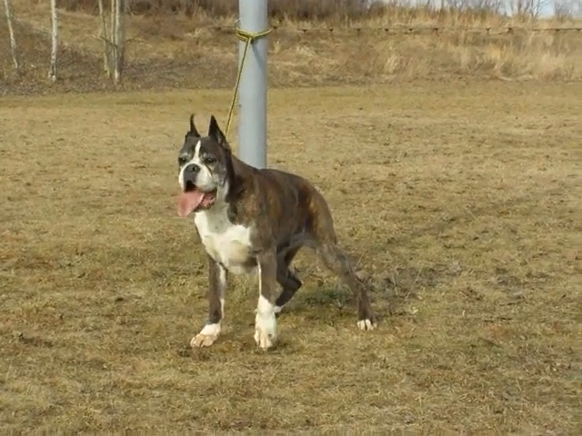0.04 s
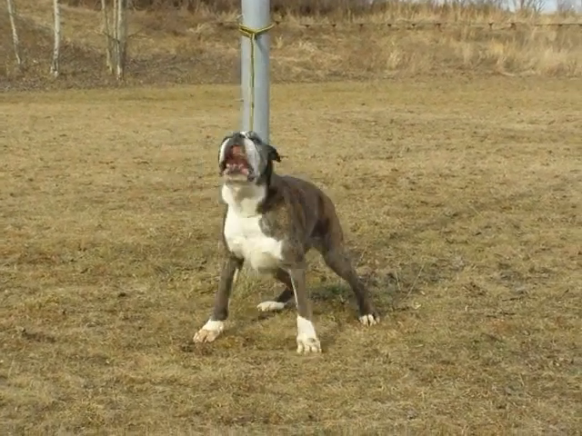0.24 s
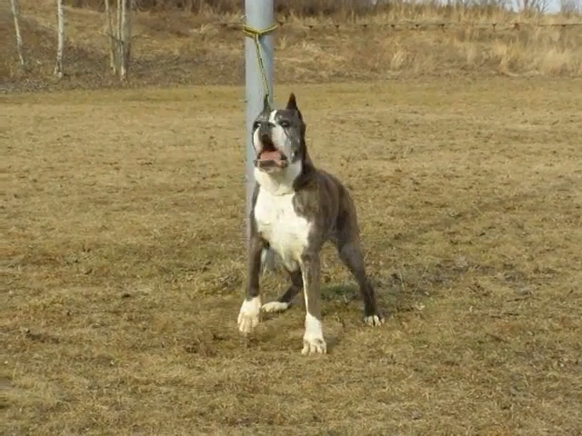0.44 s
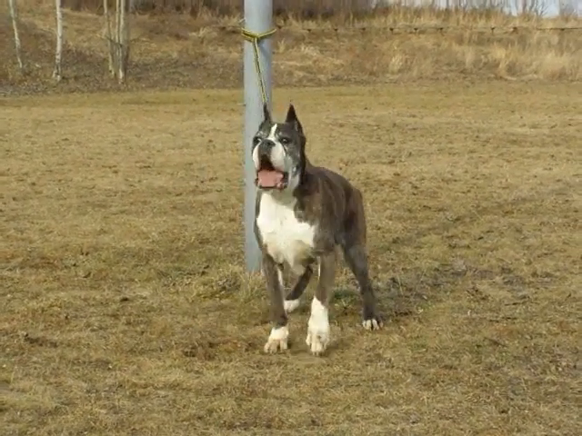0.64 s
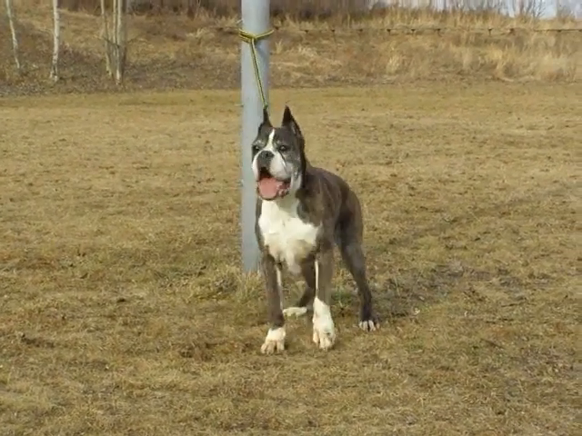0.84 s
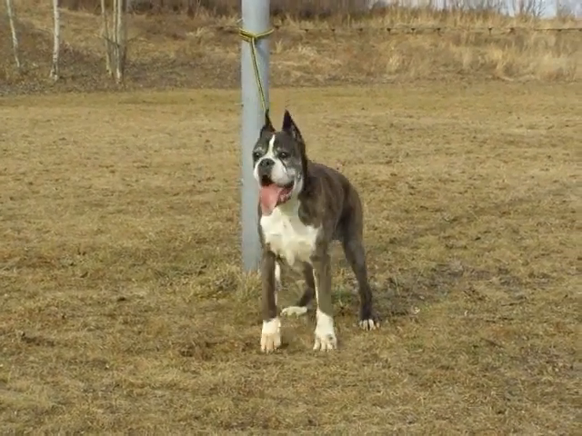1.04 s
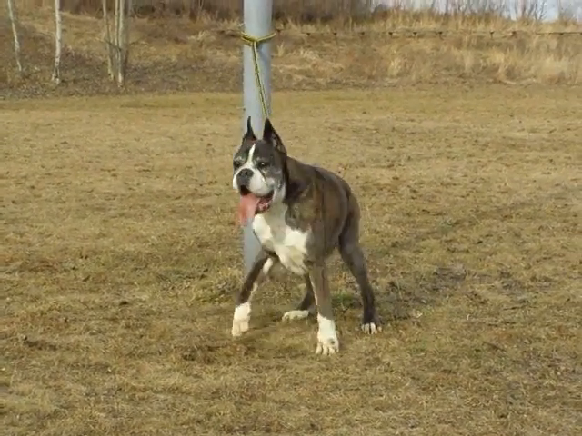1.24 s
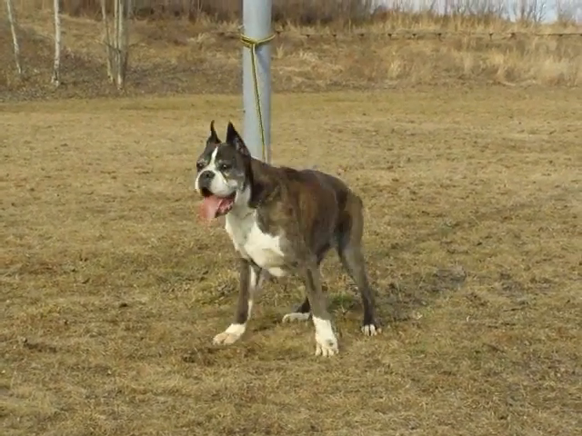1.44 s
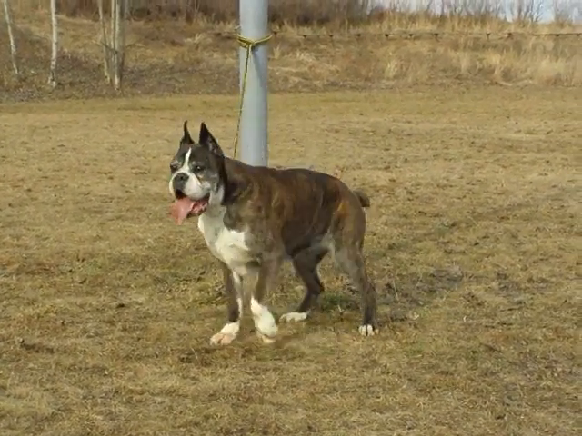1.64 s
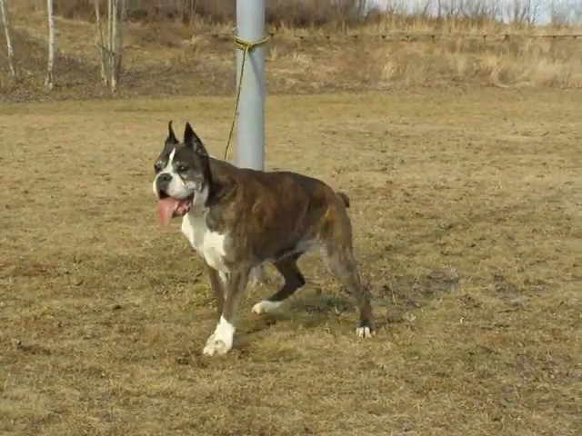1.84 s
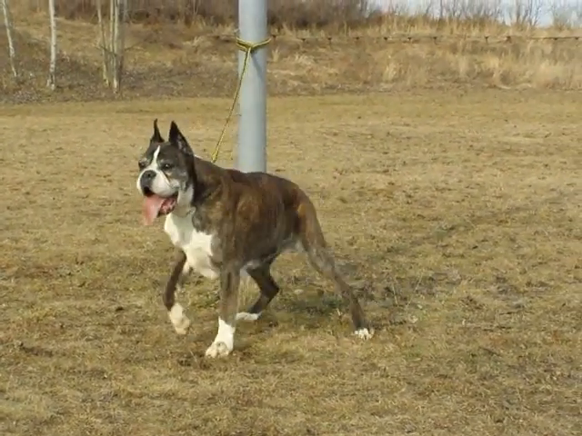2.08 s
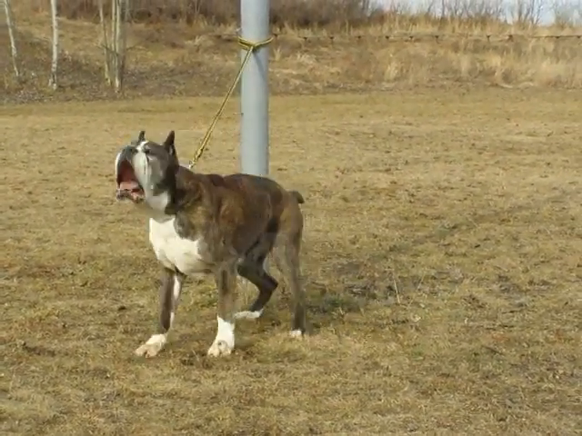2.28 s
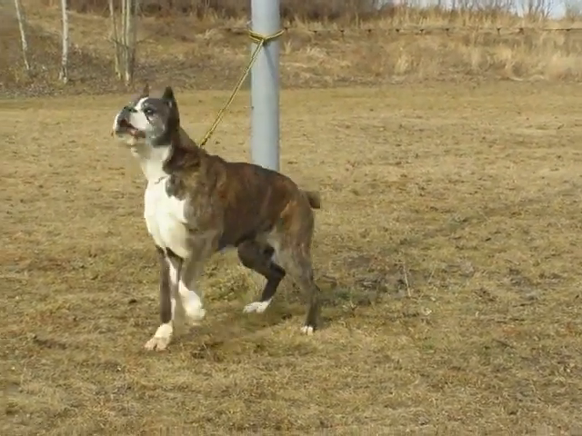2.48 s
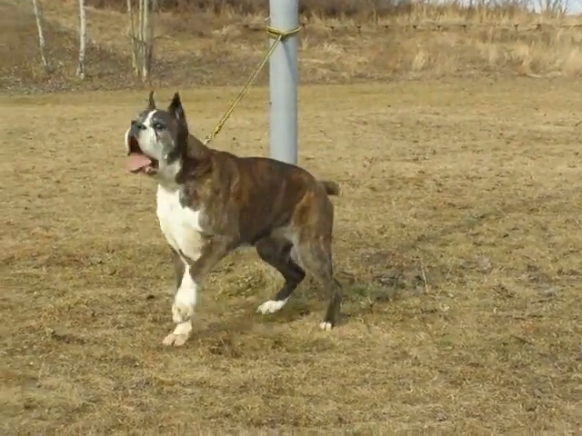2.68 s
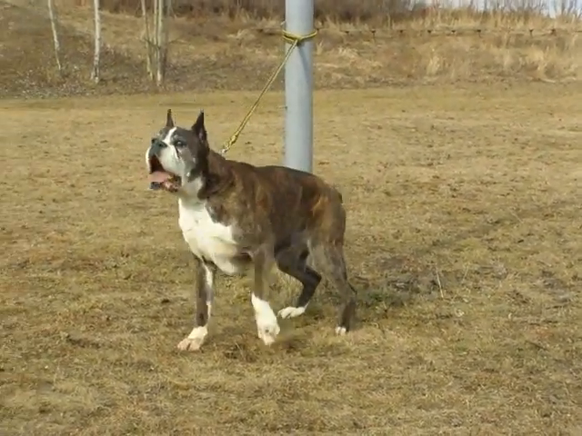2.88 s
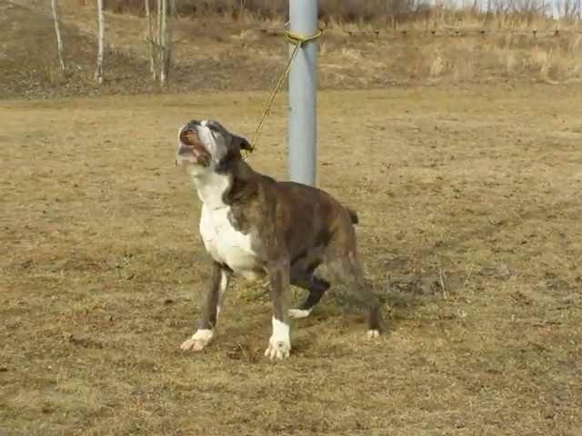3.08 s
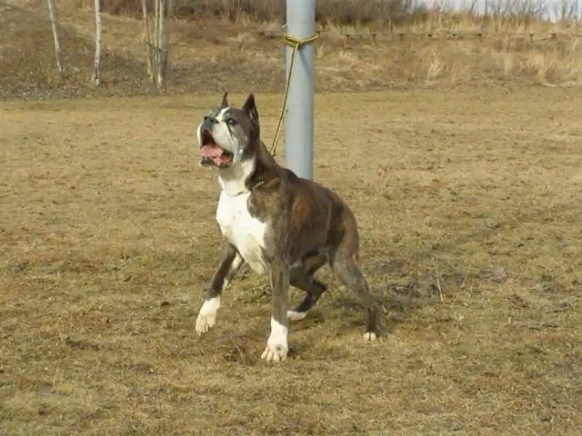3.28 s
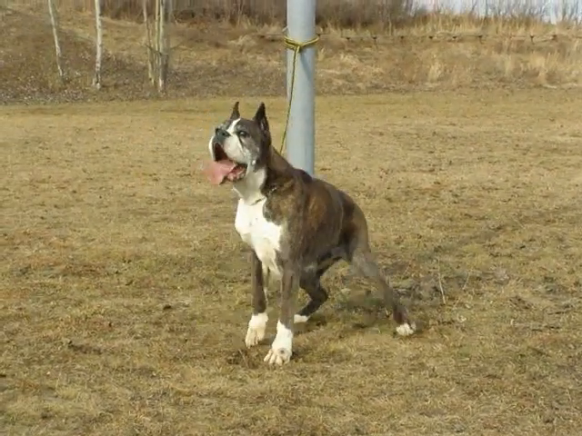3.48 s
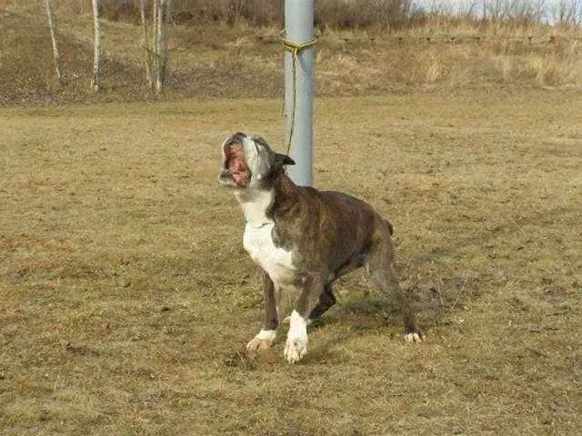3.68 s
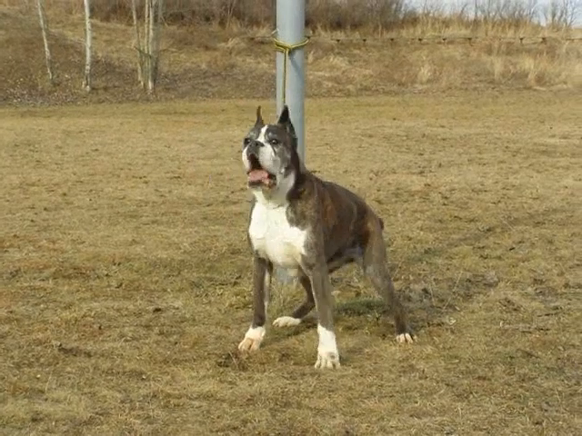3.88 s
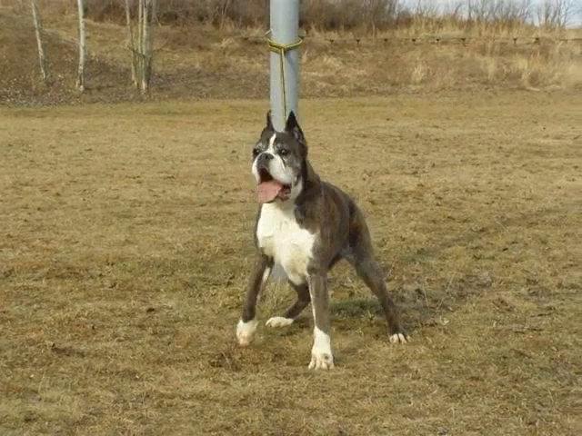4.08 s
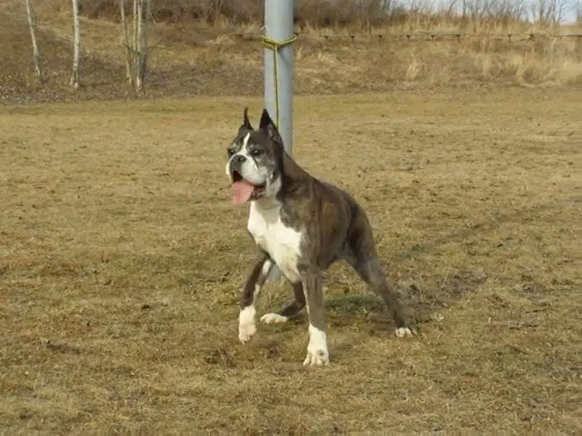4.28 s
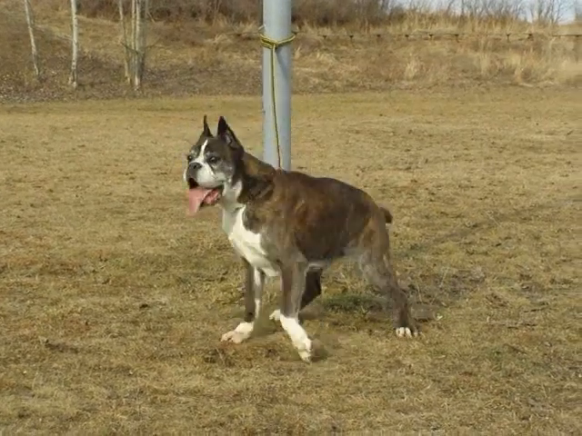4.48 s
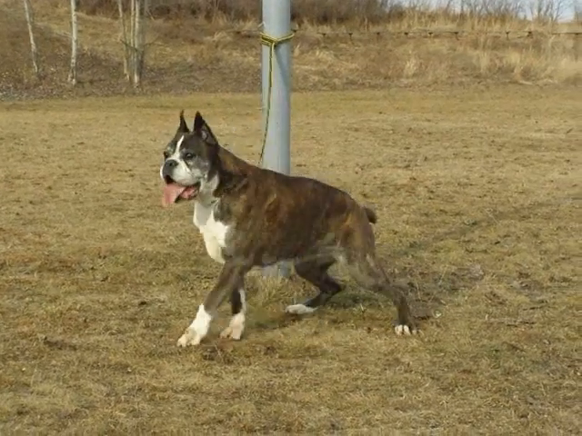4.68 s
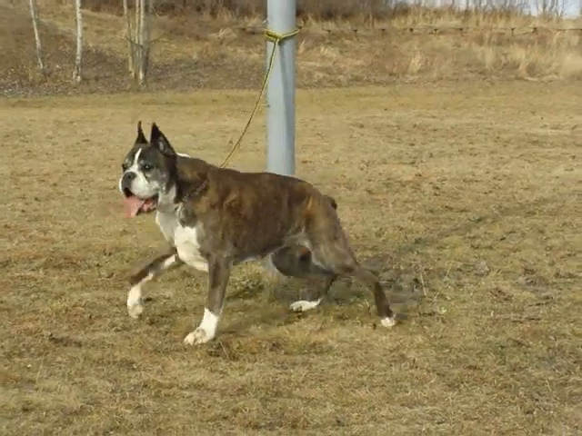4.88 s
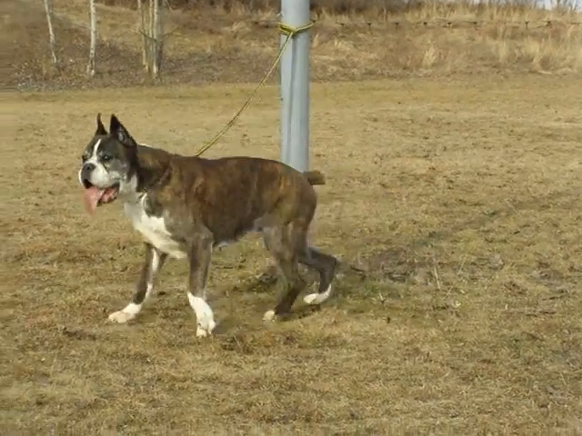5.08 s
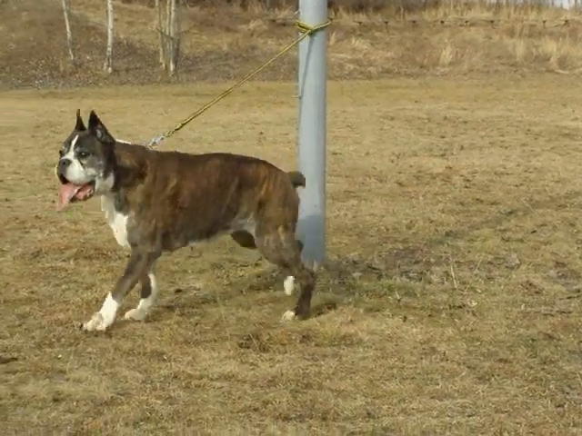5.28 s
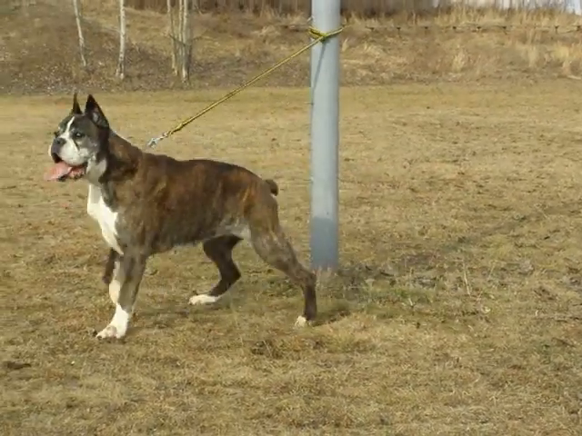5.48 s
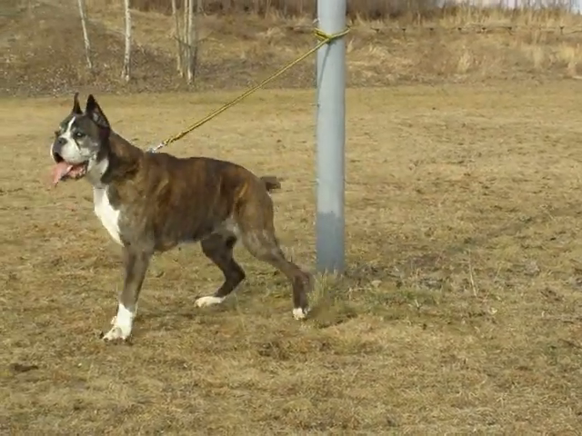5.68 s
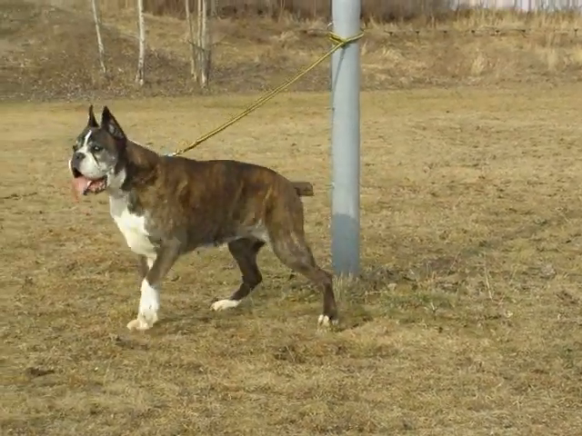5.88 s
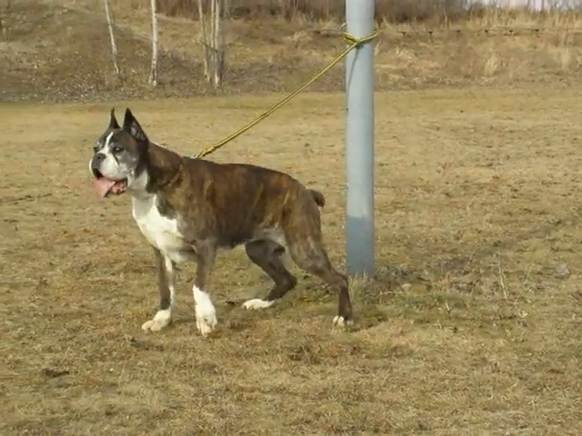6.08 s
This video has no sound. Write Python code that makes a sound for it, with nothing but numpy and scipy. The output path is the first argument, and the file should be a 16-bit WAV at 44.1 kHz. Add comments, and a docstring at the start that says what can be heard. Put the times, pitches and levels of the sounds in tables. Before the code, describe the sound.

Over a faint, steady outdoor rumble, a dog lets out four short, rough barks: one at the start, then three closer together after some huffing and panting. Soft paw thuds, a smack of the lips and a brief, faint whine fall between the later barks. The dog then goes on panting lightly. The barks echo a little across open ground, and a cheap camera microphone adds a grainy edge.

```python
"""Over a faint outdoor rumble, an old dog tied to a pole in a field huffs, barks four times and pants.
Each bark rises as a clean tone, breaks into a rough roar as the vocal folds are overblown, and sinks
away in a low grunt. An earth bank reflects it; paws thud on the turf, the dog gasps, and before the
last bark its lips pop and it whines. A pocket camera samples it all slowly and coarsely and holds
each sample, which adds a gritty mirrored treble."""
import sys
import numpy as np
from scipy import signal
from scipy.fft import rfft, irfft, next_fast_len
from scipy.io import wavfile
from scipy.ndimage import uniform_filter1d, map_coordinates

SR = 44100
rng = np.random.default_rng(int(sys.argv[2]) if len(sys.argv) > 2 else 0)


def dump(signal):
    """Clip the signal to [-1, 1] and save it as 16-bit WAV at the path in sys.argv[1]."""
    limited = np.clip(np.atleast_2d(signal).T, -1, 1)
    pcm = np.round(limited * 32767).astype(np.int16)
    wavfile.write(sys.argv[1], SR, pcm)


N = 270774
TIME = np.arange(N) / SR

# outdoor background (frequency [Hz], level [dB])
AIR_SPECTRUM = [(10, -27.5), (25, -13), (40, -14.5), (80, -8), (280, -4), (520, -4), (800, -11),
                (1400, -12.5), (2300, -17), (3200, -22.5), (4000, -18.5), (5000, -60)]
# huffs as the jaws open (time [s], level [dB], decay time [s], lips [0 forward to 1 drawn back])
JAW_HUFFS = [(0.309, -29.5, 0.015, 0.26), (.971, -25, 0.018, 0.033), (1.455, -37, 0.012, 0.42),
             (1.879, -34.5, 0.011, 0.33), (2.351, -28.5, 0.027, 0.34), (3.096, -35, 0.027, 0.22),
             (3.562, -33.5, 0.0089, 0.32), (3.763, -32.5, 0.038, 0.26), (4.808, -45, 0.018, 0.56),
             (5.173, -41.5, .01, 0.75), (5.595, -43, 0.0057, 0.27), (6.055, -44, .015, 0.9)]
# pants (time [s], attack [s], length [s], level [dB], lips [0 forward to 1 drawn back])
PANT_BREATHS = [ (0.995, 0.064, 0.18, -30, 0.028), (1.453, 0.0094, 0.16, -35, 0.45),
                (1.878, 0.0092, 0.2, -35.5, 0.51), (4.396, 0.0098, 0.16, -31, 0.059),
                (4.804, .032, 0.15, -34, 0.66), (5.193, 0.0096, 0.16, -36.5, 1),
                (5.598, 0.0076, 0.17, -36, 0.63), (6.045, 0.053, 0.12, -35.5, 0.98)]
# mouth resonances with the lips forward, then drawn back (frequency [Hz], level [dB])
LIPS_FORWARD = [(150, -43), (330, -11.5), (520, -7.5), (700, -12.5), (1080, 6), (1450, -14), (1780, -10.5),
                (2020, -16.5), (2330, 0), (2650, -5.5), (3050, -12), (3400, -42), (4000, 6)]
LIPS_BACK = [(150, -13), (330, -9.5), (520, 1), (720, -12.5), (1100, 4.5), (1500, -17), (1850, -2.5),
             (2100, -14), (2500, -6.5), (2800, -6), (3130, 2), (3500, -9), (4000, -14)]
# barks (time [s], swell [s], time to the break [s], length before the grunt [s], grunt length [s],
# first pitch [Hz], pitch at the break [Hz], level [dB], extra chest [dB], extra treble [dB],
# treble burst [dB], grunt level [dB])
BARK_CALLS = [ (.355, 0.061, .058, .18, 0.065, 289.8, 449, -2.5, 5.5, 3.5, 6.5, -29),
              (2.404, 0.072, .079, 0.21, .066, 262.1, 425.4, 0, -1, 1, 6, -29.5),
              (3.126, 0.064, .064, .202, .070, 307.6, 442, -0.5, 1.5, -1, 10.5, -29.5),
              (3.792, 0.03, 0.049, 0.16, .066, 284.5, 476.6, 1, -2, 0, 9, -26.5)]
# chest, throat and treble registers of the voice
# (delay [s], attack curve [exponent], roar level [dB], burst decay [s], sag [dB/s], release [s])
VOICE_REGISTERS = [ (0.011, 1.54, -25.5, 0.015, 47, 0.0027), (0.0012, 0.92, -14.5, 0.09, 2, 0.03),
                   (0.009, 1.44, -24.5, 0.029, 24, 0.021)]
# vocal tract resonances with the mouth opening, then wide (frequency [Hz], level [dB])
TRACT_OPENING = [(250, 12), (700, 26.5), (1150, 18), (1330, -17), (1560, -17.5), (1850, 4.5), (2050, -17.5),
                 (2300, -1), (2700, 2), (3050, -21), (3900, -21)]
TRACT_WIDE = [(180, -59.5), (300, -16.5), (375, -13), (500, -13), (590, 1.5), (670, -1), (790, 2.5),
              (960, 8), (1130, -1), (1400, -29.5), (1600, -28.5), (1730, -18), (1900, -20.5), (2030, -38),
              (2200, -18.5), (2450, -18), (2700, -23.5), (2980, -41.5), (3400, -28), (3900, -32)]
# decay of the scattered echo (frequency [Hz], time to fall 60 dB [s])
TAIL_DECAY = [(150, 1), (600, 0.44), (1200, 1), (3000, 0.69)]
# colour of the whole echo (frequency [Hz], level [dB])
ECHO_SPECTRUM = [(200, -6.5), (400, 1), (650, 5), (1100, -7), (2500, -9.5)]
# paws landing (time [s], level [dB])
FOOTFALLS = [(0.57, -39), (.594, -33), (.629, -35), (2.881, -38), (2.927, -38.5), (3.006, -27),
             (3.046, -26), (3.071, -26), (3.099, -30.5), (3.126, -30), (3.459, -42.5), (5.529, -36)]
# thud of the turf (frequency [Hz], level [dB])
TURF_SPECTRUM = [(30, -30.5), (55, -30), (80, -8.5), (115, -3), (185, 7), (300, 2), (500, -14), (900, -28),
                 (2000, -70)]
# a paw dragging through dry grass (time [s], length [s], level [dB])
PAW_DRAGS = [(5.494, 0.075, -46.5)]
# gasps (time [s], length [s], level [dB], whistle frequency [Hz], whistle level [dB])
IN_BREATHS = [(0.576, 0.15, -42.5, 3230, -53), (2.667, 0.12, -38, 2257, -46), (3.385, 0.15, -37, 2316, -45),
              (4.006, 0.14, -37, 2350, -50)]
# mouth resonances as air is drawn in (frequency [Hz], level [dB])
INHALE_SPECTRUM = [(150, -7), (400, -0.5), (600, -1), (1000, -1), (1450, -9.5), (1850, -8), (2050, -5),
                   (2300, -5.5), (2650, -8), (2950, -13.5), (3280, 2.5), (3550, 2.5), (4000, -9)]
# wet pops of the loose lips (time [s], mouth resonance [Hz], level [dB])
LIP_POPS = [(3.462, 927.6, -14), (3.482, 930, -13), (3.559, 1310, -22.5)]
# a thin whine (time [s], length [s], first pitch [Hz], fall [Hz/s], level [dB])
NASAL_WHINES = [(3.618, .135, 572, 606, -36)]

ROAR_HZ, GRUNT_HZ = 392.3, 129.7  # pitch through the roar and at the end of the grunt
RISE_ROUGH, ROAR_ROUGH, GRUNT_ROUGH = 0.12, 0.86, 0.33  # 0 regular to 1 fully rough


def amp(db):
    """Decibels to amplitude ratio."""
    return 10 ** (np.asarray(db) / 20)


def unit(x):
    """Normalisation to rms 1."""
    return x / np.sqrt(np.mean(x ** 2) + 1e-20)


def steady(x, window_s=0.0065):
    """Normalisation to a running rms of 1, which keeps the fast grain."""
    size = max(int(window_s * SR), 50)
    power = uniform_filter1d(uniform_filter1d(x * x, size), size)
    return x / np.sqrt(np.abs(power) + 1e-12)


def along(points, hz):
    """Interpolation of (frequency [Hz], value) points on a logarithmic axis."""
    f, v = np.transpose(points)
    return np.interp(np.log(hz + 1), np.log(f + 1), v)


def wobble(rate):
    """Smooth random modulation: a spline through `rate` knots a second."""
    return map_coordinates(rng.standard_normal(int(N * rate / SR) + 4), [TIME * rate])


def filtered(x, response):
    """Linear filtering: the spectrum of x times a frequency response."""
    size = next_fast_len(N + SR // 2)
    return irfft(rfft(x, size) * response(np.fft.rfftfreq(size, 1 / SR)), size)[:N]


def ring(x, spectrum, size=4096):
    """Minimum-phase filtering: resonances ring only after their excitation."""
    gain = amp(along(spectrum, np.fft.rfftfreq(size, 1 / SR)))
    cepstrum = irfft(np.log(gain + 1e-6))
    cepstrum[1:size // 2] *= 2
    cepstrum[size // 2 + 1:] = 0
    return signal.fftconvolve(x, irfft(np.exp(rfft(cepstrum))))[:N]


def band(x, lo_hz, hi_hz, order=12):
    """Band-pass filtering, with edges that steepen with the order."""
    return filtered(x, lambda f: (1 - 1 / (1 + (f / lo_hz) ** order)) / (1 + (f / hi_hz) ** order))


def noise(spectrum):
    """Spectral shaping of white noise, at rms 1."""
    return unit(filtered(rng.standard_normal(N), lambda f: amp(along(spectrum, f))))


def envelope(start, attack, length, release, sag_db_per_s=0, curve=1):
    """Amplitude envelope: attack, sagging hold and release."""
    t = TIME - start
    rise = np.clip(t / attack, 0, 1) ** curve
    fall = np.clip((length - t) / release, 0, 1)
    return rise * fall * amp(-sag_db_per_s * np.clip(t - attack, 0, length))


def field(level_db=-50.5, drift_db=0.4):
    """Ambient noise: a far rumble and a soft hiss of air, nearly stationary."""
    return amp(level_db + drift_db * wobble(2)) * noise(AIR_SPECTRUM)


def mouth(resonances):
    """Source and filter: turbulent air is coloured by the mouth cavity, at rms 1."""
    return unit(band(noise(resonances), 130, 3200))


def panting(flutter_db=1.58, flap_db=2.0, flap_hz=52):
    """Turbulent flow: huffs escape as the jaws open; the flapping tongue modulates each pant."""
    forward, back = mouth(LIPS_FORWARD), mouth(LIPS_BACK)
    air = lambda lips: np.sqrt(1 - lips) * forward + np.sqrt(lips) * back
    flap = np.sin(2 * np.pi * np.cumsum(flap_hz * (1 + 0.2095 * wobble(30))) / SR)
    tongue = unit(amp(flutter_db * wobble(170) + flap_db * flap))
    sound = np.zeros(N)
    for start, db, decay, lips in JAW_HUFFS:
        age = np.clip((TIME - start) / decay, 0, 10)
        sound += amp(db) * (1 - np.exp(-age / 0.08)) * np.exp(-1.5 * age ** 2) * air(lips)
    for start, attack, length, db, lips in PANT_BREATHS:
        breath = envelope(start, attack, length, release=0.066, sag_db_per_s=19)
        sound += amp(db) * breath * tongue * air(lips)
    return sound


def vocal_folds(catch_s=0.013, lead_s=0.009, break_s=0.023, settle_s=0.022, relax_s=0.015):
    """Pitch and roughness of a driven oscillator: it catches, climbs, breaks, droops as pressure goes."""
    pitch, rough = np.full(N, ROAR_HZ), np.zeros(N)
    for start, _, climb_s, length, grunt_s, first_hz, top_hz, *_ in BARK_CALLS:
        now = TIME >= start
        t = TIME[now] - start
        climb = first_hz + (top_hz - first_hz) * np.minimum(t / climb_s, 1)
        settled = np.clip((t - climb_s) / settle_s, 0, 1)
        droop = np.clip((t - length) / grunt_s, 0, 1) ** 1.5
        pitch[now] = climb + (ROAR_HZ - climb) * settled + (GRUNT_HZ - ROAR_HZ) * droop
        catch = 0.31 * np.exp(-t / catch_s)
        breaking = (ROAR_ROUGH - RISE_ROUGH) * np.clip((t - climb_s + lead_s) / break_s, 0, 1)
        relaxing = (GRUNT_ROUGH - ROAR_ROUGH) * np.clip((t - length) / relax_s, 0, 1)
        rough[now] = RISE_ROUGH + catch + breaking + relaxing
    return pitch * (1 + 0.012 * wobble(60)), np.clip(rough, 0, 1)


def register_gains(chest_burst_db=12.5, throat_burst_db=-1.5):
    """Onset transient and sustain: each register swells, settles to the roar, ends; the chest grunts on."""
    gain = np.zeros((len(VOICE_REGISTERS), N))
    for start, swell, _, length, grunt_s, _, _, db, chest_db, treble_db, bite_db, grunt_db in BARK_CALLS:
        since_swell = np.maximum(TIME - start - swell, 0)
        extras, bursts = (chest_db, 0, treble_db), (chest_burst_db, throat_burst_db, bite_db)
        for k, (delay, curve, roar_db, burst_s, sag, release) in enumerate(VOICE_REGISTERS):
            burst_db = bursts[k] * np.exp(-(since_swell / burst_s) ** 2)
            shape = envelope(start + delay, swell - delay, length - delay, release, sag, curve)
            gain[k] += amp(db + extras[k] + roar_db + burst_db) * shape
        grunt = envelope(start + length, attack=0.042, length=grunt_s, release=0.013, curve=1.6)
        gain[0] += amp(grunt_db) * grunt
    return gain


def glottis(phase, pitch, rough, jitter=0.15, shimmer_db=4, doubling=0.32):
    """Jitter, shimmer and period doubling: rough folds pulse unevenly and every second beat weakens."""
    cycles = np.flatnonzero(np.diff(np.floor(phase)) > 0)
    late, size = rng.standard_normal((len(cycles), 2)).T
    roughness = rough[cycles]
    beat = 1 + doubling * roughness * (-1) ** np.arange(len(cycles))
    when = np.clip(cycles + jitter * roughness * late * SR / pitch[cycles], 0, N - 1).astype(int)
    return np.bincount(when, beat * amp(shimmer_db * roughness * size), N)


def barks(breathy=0.7, tremor=0.05, shimmer_db=8, rasp_db=1.36, harmonics=11):
    """Nonlinear vibration: overblown folds pass from clean harmonics to uneven pulses and turbulence."""
    pitch, rough = vocal_folds()
    chest, throat, treble = register_gains()
    slack = np.clip(1 - pitch / 360, 0, 1)  # loose folds flap unevenly in the low grunt
    waver = (0.006 + tremor * rough + 0.153 * slack ** 2) * wobble(260)
    phase = np.cumsum(pitch * (1 + waver)) / SR
    fundamental = np.cos(2 * np.pi * phase) * amp(shimmer_db * slack * wobble(250))
    overtones = sum(amp(along(TRACT_OPENING, k * pitch)) * np.cos(2 * np.pi * k * phase - k * k)
                    for k in range(2, harmonics + 1))
    opening = (1 + np.cos(2 * np.pi * phase)) / 2  # air passes while the folds are open
    pulses = unit(glottis(phase, pitch, rough))
    turbulence = unit(opening * rng.standard_normal(N))
    roar = ring(pulses + breathy * turbulence, TRACT_WIDE)
    angle = rough * np.pi / 2  # equal-power crossfade
    blend = lambda clean, noisy: steady(np.cos(angle) * steady(clean) + np.sin(angle) * steady(noisy))
    low = chest * blend(fundamental, band(roar, 326, 558))
    middle = throat * blend(band(overtones, 400, 1020), band(roar, 410, 1930))
    high = treble * blend(band(overtones, 1310, 4200), band(roar, 1254, 4550))
    return (low + middle + high) * amp(rasp_db * rough * wobble(160))


def echo(x, delay_s=0.168, spread_s=0.024, bank_db=-22, scatter_db=-18.5):
    """Reflection and scattering: the earth bank answers once, blurred; brush and trees add a tail."""
    hz, frame_s, spectra = signal.stft(rng.standard_normal(SR), SR, nperseg=256)
    decay = amp(-60 * frame_s / along(TAIL_DECAY, hz)[:, None])
    tail = signal.istft(spectra * decay, SR, nperseg=256)[1][:SR]
    t = np.arange(SR) / SR
    tail *= 1 - np.exp(-(t / 0.089) ** 3)  # open ground: little comes back early
    slap = rng.standard_normal(SR) * (t > delay_s) * np.exp(-np.abs(t - delay_s) / spread_s)
    response = amp(bank_db) * slap / np.linalg.norm(slap) + amp(scatter_db) * tail / np.linalg.norm(tail)
    return ring(signal.fftconvolve(x, response)[:N], ECHO_SPECTRUM)


def paws(t60=0.1, grass_db=-24):
    """Impact and friction: each paw thuds on the turf and crunches dry grass; one drags."""
    force = np.zeros(N)
    for start, db in FOOTFALLS:
        t = np.maximum(TIME - start, 0)
        force += amp(db - 60 * t / t60) * (1 - np.exp(-t / 0.00096))
    grass = unit(band(rng.standard_normal(N) * amp(3.7 * wobble(700)), 770, 4600, order=4))
    (start, length, db), = PAW_DRAGS
    drag = amp(db) * envelope(start, attack=0.008, length=length, release=0.021, sag_db_per_s=90)
    thuds = band(force * steady(noise(TURF_SPECTRUM)), 43, 3000, order=4)
    return thuds + (amp(grass_db) * force + drag) * grass


def gasps():
    """Flow through a constriction: air snatched after each bark whistles faintly in the narrow throat."""
    sound, air = np.zeros(N), mouth(INHALE_SPECTRUM)
    for start, length, db, hz, whistle_db in IN_BREATHS:
        whistle = unit(wobble(158) * np.sin(2 * np.pi * hz * TIME))  # narrow-band noise
        breath = envelope(start, attack=0.031, length=length, release=0.028)
        sound += breath * (amp(db) * air + amp(whistle_db) * whistle)
    return sound


def lip_pops(t60=0.018):
    """Damped resonance: parting lips ring the mouth cavity for a few cycles."""
    sound = np.zeros(N)
    for start, hz, db in LIP_POPS:
        t = np.maximum(TIME - start, 0)
        sound += amp(db - 60 * t / t60) * (1 - np.exp(-t / 0.0014)) * np.sin(2 * np.pi * hz * t)
    return sound


def whine(overtone_db=-18):
    """Nasal radiation: a thin, unsteady note of two harmonics sinks in pitch and level."""
    (start, length, hz, fall, db), = NASAL_WHINES
    pitch = hz - fall * np.clip(TIME - start, 0, length)
    phase = 2 * np.pi * np.cumsum(pitch * (1 + 0.05 * wobble(260))) / SR
    shape = envelope(start, attack=0.028, length=length, release=0.025, sag_db_per_s=60)
    return amp(db + 2.9 * wobble(130)) * shape * (np.sin(phase) + amp(overtone_db) * np.sin(2 * phase))


def scene():
    """Superposition: the dog's direct sound, its echo and the open field add."""
    dog = barks() + panting() + gasps() + lip_pops() + whine() + paws()
    return (dog + echo(dog) + field())[None]


def record(dry, rate_hz=7875, step=1 / 128, ceiling=0.85, knee=8, top_hz=15780):
    """Sample and hold mirrors the sound around multiples of the camera's rate; quantisation adds grit."""
    band_limited = filtered(dry[0], lambda f: 1 / (1 + (f / (rate_hz / 2)) ** 40))
    ticks = np.floor(TIME * rate_hz) * SR / rate_hz
    held = map_coordinates(band_limited, [ticks])
    saturated = held / (1 + np.abs(held / ceiling) ** knee) ** (1 / knee)  # rounds the strongest swings
    quantised = np.floor(saturated / step) * step
    return filtered(quantised, lambda f: f < top_hz)[None]


dry = scene()
out = record(dry)
dump(out)
```